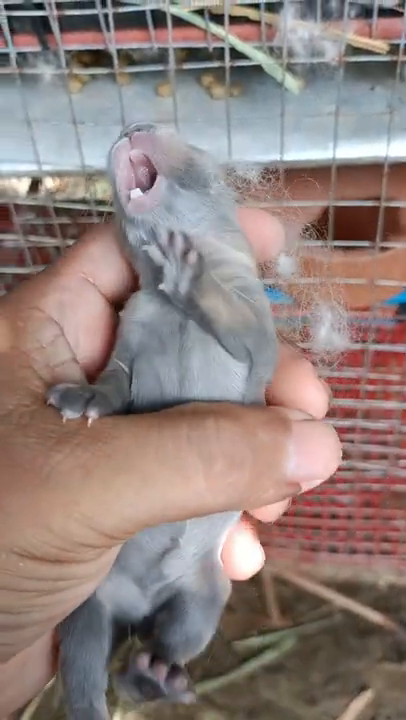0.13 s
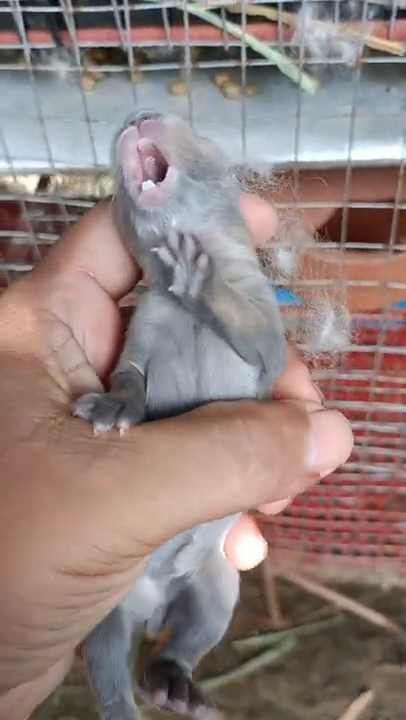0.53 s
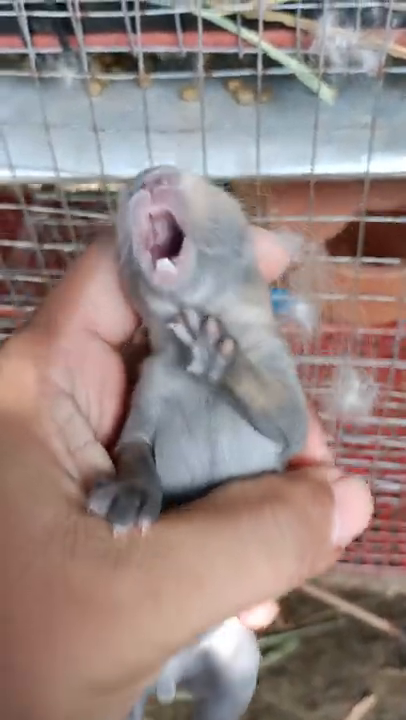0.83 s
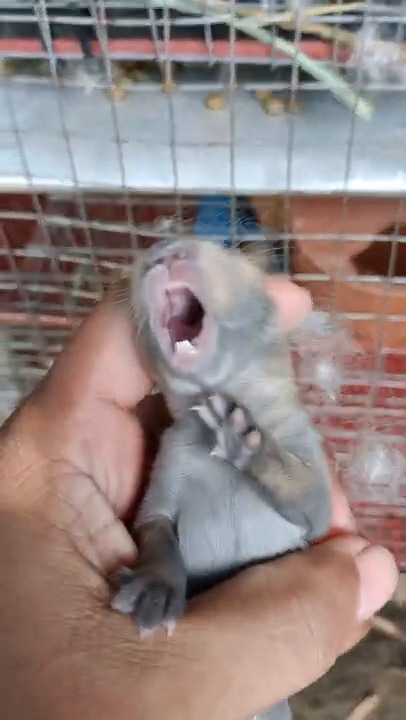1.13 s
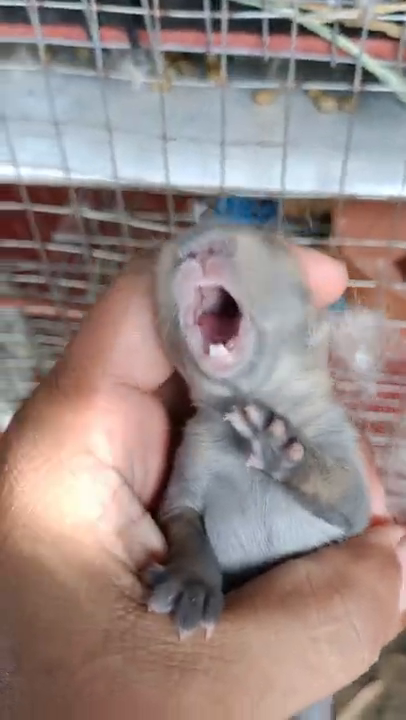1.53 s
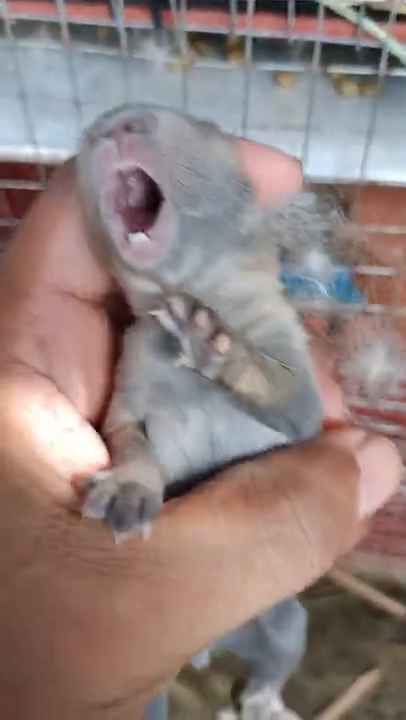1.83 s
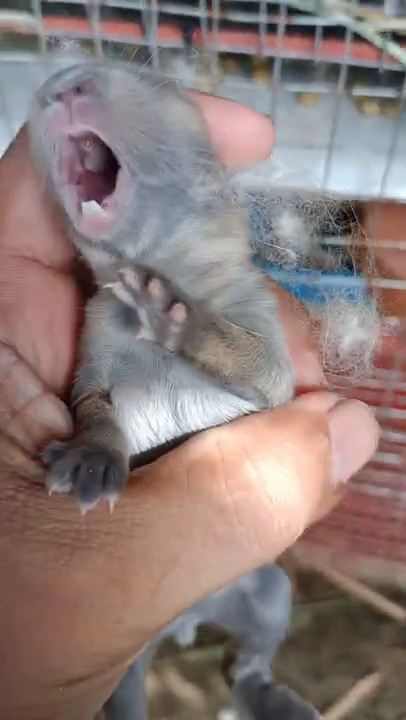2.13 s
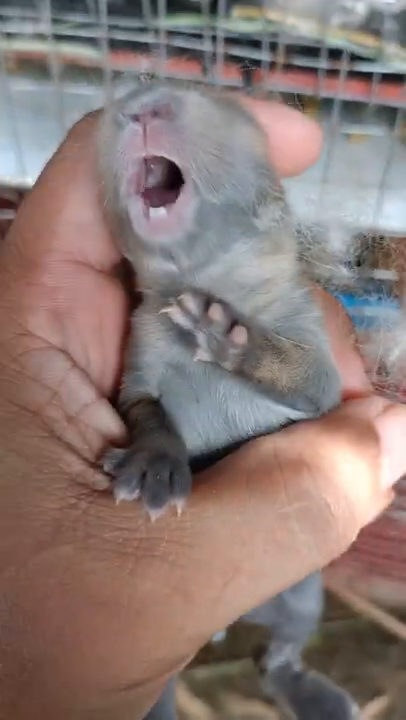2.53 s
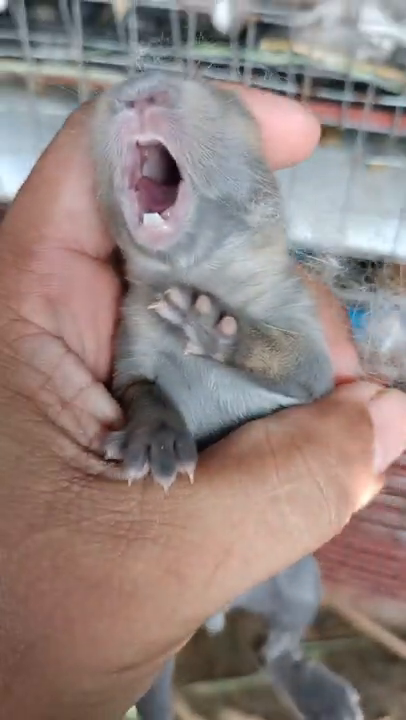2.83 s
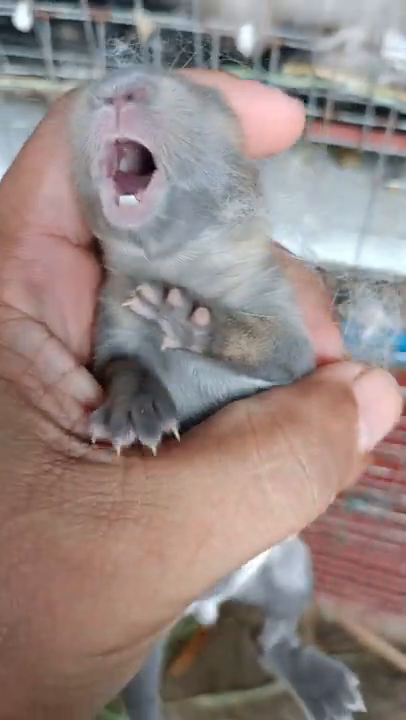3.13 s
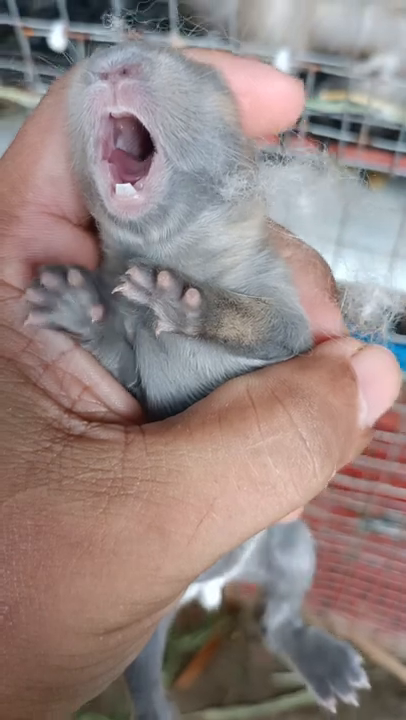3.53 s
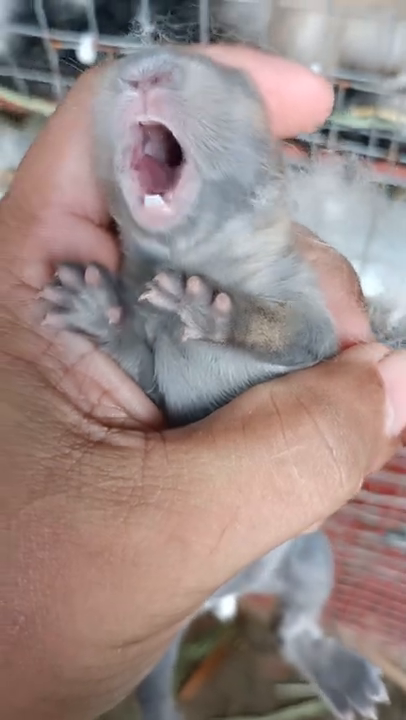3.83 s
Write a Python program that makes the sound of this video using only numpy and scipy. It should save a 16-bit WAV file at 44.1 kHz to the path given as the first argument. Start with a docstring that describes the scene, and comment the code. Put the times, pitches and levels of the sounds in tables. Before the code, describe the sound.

Harsh, piercing squeals of a baby rabbit repeat about every 0.6 seconds over faint shed hiss.

```python
"""Squeals of a young rabbit, the first already under way, come again and again from close to two ports.
Pulsed vocal folds and gated turbulence excite its throat: pitch rises, strong-weak pulses set in, and
the end sags hoarsely. Gliding narrow-band noise makes a thin wheeze between some squeals. Shaped noise
and a wavering sine give the faint hiss, rumble and hum of an open shed; dying dark noise gives two
dull thumps, and swelling near-sines give far cooing."""
import sys
import numpy as np
from scipy import signal
from scipy.fft import rfft, irfft, next_fast_len
from scipy.io import wavfile
from scipy.ndimage import uniform_filter1d, map_coordinates

SR = 44100
rng = np.random.default_rng(int(sys.argv[2]) if len(sys.argv) > 2 else 0)


def unload_wav(signal):
    """Save mono or channel-first audio to the path in sys.argv[1] as 16-bit WAV at rate SR, clipped to [-1, 1]."""
    wavfile.write(
        sys.argv[1],
        SR,
        np.round(np.clip(np.atleast_2d(signal).T, -1, 1) * 32767).astype(np.int16),
    )


N = 176400

# Pitch contour, one table per squeal: [t/s, f/Hz]
PITCH = [
    [(0.0, 1049), (0.024, 1233), (0.032, 1575), (0.066, 1106)],
    [(0.209, 774.1), (0.237, 1487), (0.263, 1749), (0.281, 1695), (0.301, 1980), (0.337, 2065),
     (0.413, 2086), (0.519, 2297), (0.611, 2114), (0.669, 1890), (0.685, 1472), (0.701, 996), (0.719, 899),
     (0.729, 1077), (0.741, 851), (0.776, 882)],
    [(0.916, 860.4), (0.95, 1777), (1.012, 2057), (1.052, 2197), (1.085, 2230), (1.11, 2186), (1.15, 2215),
     (1.172, 2256), (1.24, 2200), (1.254, 1980), (1.27, 1594), (1.3, 1622), (1.322, 940), (1.346, 1032),
     (1.364, 868), (1.398, 826)],
    [(1.542, 1101), (1.57, 1706), (1.6, 1950), (1.702, 2212), (1.812, 2162), (1.844, 2111), (1.866, 1960),
     (1.902, 1314), (1.92, 883), (1.942, 876), (1.958, 806), (1.99, 890), (1.996, 888)],
    [(2.142, 1127), (2.18, 1809), (2.288, 2197), (2.458, 2127), (2.468, 1910), (2.49, 1667), (2.5, 1337),
     (2.51, 1034), (2.54, 725), (2.564, 658), (2.582, 943)],
    [(2.728, 1050), (2.748, 1417), (2.77, 1745), (2.798, 1930), (2.894, 2170), (3.008, 2116), (3.022, 1930),
     (3.038, 1893), (3.054, 1433), (3.07, 1419), (3.086, 1022), (3.106, 1434), (3.118, 1414), (3.13, 795),
     (3.148, 671), (3.186, 722)],
    [(3.329, 837), (3.347, 1248), (3.359, 1637), (3.381, 1836), (3.487, 2190), (3.525, 2200), (3.625, 2097),
     (3.639, 1687), (3.655, 1670), (3.665, 1336), (3.681, 1330), (3.707, 890), (3.735, 749)],
    [(3.893, 868), (3.919, 1372), (3.941, 1640), (4.0, 1923)],
]
# Fold vibration from each moment on: [t/s, pulses per repeating pattern, pattern depth 0-1, rasp level/dB]
FOLD_REGIMES = [(0, 1, 0, -10), (.2, 1, 0, -7), (.243, 1, 0, -17), (.3, 2, .15, -13), (.367, 2, .55, -5),
                (.48, 2, .85, -19), (.57, 2, .8, -13), (.67, 2, .4, -8), (.7, 1, 0, -12), (.9, 2, .35, -7),
                (.955, 1, 0, -12), (.99, 1, 0, -8), (1.028, 3, .7, -11), (1.052, 2, .9, -17),
                (1.23, 2, .8, -12), (1.305, 1, 0, -12), (1.5, 2, .2, -8), (1.575, 1, 0, -13),
                (1.65, 3, .7, -9), (1.686, 2, .9, -18), (1.86, 2, .7, -11), (1.895, 1, 0, -13),
                (1.945, 1, 0, -8), (2.1, 2, .4, -7), (2.185, 1, 0, -10), (2.235, 3, .7, -10),
                (2.28, 2, .9, -15), (2.46, 2, .7, -11), (2.5, 1, 0, -9), (2.7, 2, .35, -7),
                (2.785, 1, 0, -6), (2.83, 3, .7, -9), (2.862, 2, .9, -14), (2.93, 2, .9, -10),
                (2.968, 2, .9, -17), (3.05, 1, 0, -14), (3.105, 1, 0, -9), (3.3, 2, .25, -8),
                (3.38, 1, 0, -7), (3.423, 3, .7, -12), (3.468, 2, .9, -17), (3.625, 2, .4, -11),
                (3.66, 1, 0, -9), (3.85, 1, 0, -9), (3.945, 2, .2, -5)]
# Lead of the pattern train over the plain pulse train, before its wander: [cycles], one per squeal
PATTERN_LEAD = [0.019, 0.072, 0.12, 0.085, 0.11, 0.011, 0.1, 0.018]
# Unsteady four-pulse pattern on top of the two-pulse one, before rasp colour: [level/dB], one per squeal
QUARTER_LEVEL = [-20, -7, -16, -16, -4, -4, -6, -7]
# Spectral colour of the rasp against the pulses: [f/Hz, level/dB]
RASP_COLOUR = [(1000, -13), (3600, -14), (5000, -3), (9000, -3), (11000, 4)]
# Transfer function of throat, mouth and microphone: [f/Hz, level/dB]
THROAT = [(500, -43.5), (800, -21.5), (1500, -15), (2200, -9), (3300, -15), (4300, -8), (5400, 3),
          (6000, -3), (6600, -2.5), (7200, -7.5), (8200, 2.5), (9000, -6), (9700, -13.5), (12500, -21.5),
          (16000, -19)]
# Mouth settings, one row per squeal: [partials under the resonance level/dB, resonance level/dB]
MOUTH = [(3, -14.7), (-1, -1.9), (-1.5, 3.5), (-5, 0), (1, 0.7), (0, 3.7), (1.5, -0.8), (2, 2)]
# Vocal effort before the port gain, one table per whole squeal:
# [t/s, level/dB, upper throat resonance level/dB, treble level/dB]
EFFORT = [
    [(0.209, -27, -8, -27), (0.215, -25, -13, 3.5), (0.253, -19, 4.5, 3.5), (0.665, -16.5, 9.5, 2.5),
     (0.759, -24, -9.5, -2), (0.776, -41, -14, -13)],
    [(0.916, -27.5, -30, -25), (0.93, -20, -1.5, 1.5), (1.098, -15, 0, -4), (1.27, -16, 3, -2.5),
     (1.382, -21.5, -10, -4), (1.398, -39.5, -7, -31)],
    [(1.542, -20, -11, -6.5), (1.548, -19, -11.5, 0), (1.648, -15.5, 1, -2), (1.89, -17, 0.5, 1),
     (1.982, -22.5, -11.5, -5), (1.996, -33, -16, -1)],
    [(2.142, -16.5, -14, -3), (2.15, -21, -12, 3), (2.172, -17.5, 5, 4), (2.492, -14.5, 9, 5),
     (2.562, -21, -8.5, 8.5), (2.582, -38.5, -37.5, -15)],
    [(2.728, -23, -3, -25), (2.738, -18.5, -11, 13), (2.768, -15.5, 7.5, 5), (3.086, -16, 3.7, 1.5),
     (3.172, -21, -7, 8), (3.186, -42, -20, -6)],
    [(3.329, -23.5, 2, 5), (3.339, -19.5, -13, 14.5), (3.365, -15, 6.5, 5.5), (3.691, -15.5, 8.5, 7.5),
     (3.717, -22, -8, 7), (3.735, -37, -29, -6)],
]
# The same columns for the squeals under way at start and end
EFFORT_AT_EDGES = [
    [(0.0, -20.5, 0.12, 0.1), (0.056, -23, 0.1, 0.1), (0.066, -40, 0.075, 0.1)],
    [(3.893, -27.5, 0.13, 0.083), (3.917, -18, 0.13, 0.12), (4.0, -14, 0.16, 0.13)],
]
# Colour change as the head turns towards the microphone: [f/Hz, level/dB]
TURNED_COLOUR = [(1000, 8), (2000, -2.5), (4200, 0.5), (5400, 5), (6600, -0.05), (9000, -2)]
# Wheeze before the port gain: [t/s, f/Hz, level/dB]
WHEEZE = [(0.06, 7060, -48), (.13, 7300, -62), (.145, 7800, -44), (.18, 7100, -44.5), (.205, 6850, -43.5),
          (.22, 6450, -80.5), (.76, 7600, -104), (.78, 7600, -46.5), (.91, 7430, -57.5), (.93, 7130, -72),
          (1.39, 7200, -110), (1.41, 7200, -55), (1.5, 7070, -59.5), (1.56, 7100, -105)]
# Right port against left: [f/Hz, level/dB]
RIGHT_COLOUR = [(500, -7), (1170, -8), (2200, 2.9), (4200, -2), (6400, -7.5), (8200, -3.5), (10500, -7.5),
                (15000, 2)]
# Lateness of the right port: [t/s, delay/s]
RIGHT_LAG = [(0, .00026), (2, 0.00026), (2.2, 0.0003), (4, .00031)]
# Echoes off hand and mesh, one table per port: [delay/s, gain]
ECHOES = [
    [(.0005, 0.07), (.0026, 0.035)],
    [(.0003, 0.38), (.0008, -0.1), (.0019, 0.5)],
]
# Shape of the background spectrum: [f/Hz, relative level/dB]
FLOOR_SPECTRUM = [(12, -54), (20, -5), (96, 0.5), (177, -13), (357, -12), (434, -13), (624, -13),
                  (1090, -18.5), (1610, -23), (3530, -26), (3950, -26), (16000, -49)]
# Background level before its 4 dB lift and wander: [t/s, level/dB]
FLOOR_LEVEL = [(0.0, -44.5), (0.42, -46.5), (3.75, -49), (4.0, -45)]
# Left-right likeness of the background: [f/Hz, likeness 0-1]
LIKENESS = [(130, 0.92), (290, 0.78), (640, 0.023)]
# Thumps: [t/s, level/dB, 60 dB decay time/s, upper band edge f/Hz]
THUMPS = [(0.145, -30, 0.25, 429), (1.051, -24.5, 0.13, 1070)]
# Far coos before their left-right balance: [t/s, length/s, f/Hz, level/dB]
COOS = [(2.6, .09, 610, -55), (3.05, .09, 600, -55), (3.36, .08, 600, -55), (3.65, .12, 590, -52),
        (3.94, .08, 590, -54)]

ATTACK_S, RELEASE_S = 0.0039, 0.0051
GLIDE_S, CHANGE_S = 0.005, 0.00064  # smoothing of pitch and of fold regime
RASP_GATE, FUNDAMENTAL = 0.72, 0.09  # depth of the rasp gating; extra weight of the lowest partial
QUARTER_WIDTH_HZ = 130
UPPER_HZ, UPPER_OCTAVES = 7600, 0.28
MOUTH_HZ, MOUTH_OCTAVES = 4430, 0.067
OPENING_S, OPENING_MOUTH_DB = 0.031, 12.5  # the mouth resonance is strong while the mouth opens
SLACK_HZ, SLACK_DB = 1900, -5  # loss under the mouth resonance, complete an octave below this pitch
TREBLE_HZ = 9500
TREBLE_HISS_DB, TREBLE_PULSES = -10, 0.85  # steady turbulence; share of the pulsed source kept
SHIFT_DB, SHIFT_RATE_HZ = 2.4, 14  # unrest of each narrow band
TURN_START_S, TURN_END_S = 1.95, 2.33
WHEEZE_WIDTH_HZ = 500
SHED_T60_S, SHED_DB = 0.27, -23.5
PORT_GAIN_DB = 6.5
HUM_HZ, HUM_DB = 121.6, -54.5
TOP, CUTOFF_HZ = 1.2, 15750


def amp(db):
    """Definition of level: 20 dB is a tenfold amplitude."""
    return 10 ** (np.asarray(db) / 20)


def rms_one(x):
    """Normalization to unit effective value."""
    return x / np.sqrt(np.mean(x ** 2) + 1e-20)


def in_time(rows):
    """Linear interpolation of each column against the first, time."""
    s, *columns = np.transpose(rows)
    return [np.interp(np.arange(N) / SR, s, column) for column in columns]


def at_hz(points, hz):
    """Interpolation along a logarithmic frequency axis."""
    table = np.array(points)
    return np.interp(np.log(hz + 1), np.log(table[:, 0]), table[:, 1])


def shaped(x, response):
    """Linear filtering: multiplication of the spectrum by a response, a function of frequency."""
    size = next_fast_len(N + SR // 4)
    hz = np.arange(size // 2 + 1) * SR / size
    return irfft(rfft(x, size) * response(hz), size)[..., :N]


def slow(rate_hz):
    """Random fluctuation: low-passed noise of spread 1."""
    low_pass = signal.butter(2, rate_hz, fs=SR, output="sos")
    return rms_one(signal.sosfilt(low_pass, rng.standard_normal(N)))


def pulses(cycles, hz):
    """Fourier synthesis of a pulse train, rms about 1: equal harmonics to 17 kHz in closed form."""
    count = np.floor(17000 / hz)
    w = np.pi * (cycles % 1) + 1e-9
    return (np.sin((2 * count + 1) * w) / np.sin(w) - 1) / np.sqrt(2 * count)


def ease(x):
    """Moving average: a step becomes a short ramp."""
    return uniform_filter1d(x, size=int(CHANGE_S * SR) + 1)


def vocal_folds(hz, which):
    """Subharmonic vibration: jittered pulses in weak-strong patterns, with rasp gated each cycle."""
    t = np.arange(N) / SR
    regimes = np.array(FOLD_REGIMES)
    now = regimes[np.clip(np.searchsorted(regimes[:, 0], t, "right") - 1, 0, None)]
    pattern, depth = np.round(now[:, 1]), np.clip(now[:, 2], 0, 1)
    two, three = ease(depth * (pattern == 2)), ease(depth * (pattern == 3))
    rasp = amp(ease(now[:, 3]))

    # rougher voice has more jitter
    jitter = slow(500) * (.1 + 4 * rasp) + slow(100) * (.25 + 5 * rasp) + 2.5 * slow(30)
    cycles = np.cumsum(hz) / SR + .008 * jitter
    lead = np.interp(t, [c[0][0] + .2 for c in PITCH], PATTERN_LEAD) + .015 * slow(15)
    led = cycles + lead
    folds = (1 - two - three) * pulses(cycles, hz)
    folds = folds + two * pulses(led / 2, hz / 2) + three * pulses(led / 3, hz / 3)
    folds = folds + FUNDAMENTAL * np.cos(2 * np.pi * cycles)

    # the difference of two trains leaves only the odd multiples of a quarter of the pitch
    odd = pulses(led / 4, hz / 4) - pulses((led + 2) / 4, hz / 4)
    quarter = two * amp(np.array(QUARTER_LEVEL)[which]) * slow(QUARTER_WIDTH_HZ) * odd

    # one noise shared by both ports plus one of each port's own
    air = rng.standard_normal(N) + rng.standard_normal((2, N))
    gating = 1 + RASP_GATE * np.cos(2 * np.pi * cycles)
    air = rasp * air * gating * amp(2.5 * slow(60))
    return folds + shaped(air + quarter, lambda f: amp(at_hz(RASP_COLOUR, f)))


def upper(f):
    """Resonance of the upper throat: a bell on a logarithmic frequency axis."""
    return np.exp(-.5 * (np.log2((f + 1) / UPPER_HZ) / UPPER_OCTAVES) ** 2)


def treble(f):
    """High-pass share above the upper resonance."""
    return (1 - upper(f)) / (1 + (TREBLE_HZ / (f + 1)) ** 10)


def mouth(f):
    """Resonance of the mouth: a narrow bell on a logarithmic frequency axis."""
    return np.exp(-.5 * (np.log2((f + 1) / MOUTH_HZ) / MOUTH_OCTAVES) ** 2)


def under(f):
    """Band-pass share of the partials under the mouth resonance."""
    return (1 - mouth(f)) * (f < MOUTH_HZ) / (1 + (1500 / (f + 1)) ** 6)


def remainder(f):
    """Complement: what the other four shares leave of the spectrum."""
    return 1 - upper(f) - treble(f) - under(f) - mouth(f)


def through_throat(x, share):
    """Source-filter principle: one share of the throat response, higher frequencies delayed more."""
    return shaped(x, lambda f: amp(at_hz(THROAT, f)) * share(f) * np.exp(-1j * (f / 2600) ** 2))


def restless(x):
    """Variable resonance: tongue and jaw never rest, so overlapping bands swell and fade independently."""
    spacing = 1100  # Hz
    out = 0
    for centre in np.arange(0, 17600, spacing):
        band = shaped(x, lambda f: np.clip(1 - abs(f - centre) / spacing, 0, 1))
        out = out + amp(SHIFT_DB * slow(SHIFT_RATE_HZ)) * band
    return out


def voice():
    """Source-filter principle: fold vibration excites throat and mouth; the level is evened, then shaped."""
    t = np.arange(N) / SR
    hz = uniform_filter1d(in_time(np.vstack(PITCH))[0], size=int(GLIDE_S * SR))
    starts = np.array([c[0][0] for c in PITCH])
    which = np.clip(np.searchsorted(starts - .05, t) - 1, 0, None)  # index of the squeal
    effort = np.vstack([EFFORT_AT_EDGES[0], *EFFORT, EFFORT_AT_EDGES[1]])
    db, upper_db, treble_db = in_time(effort)
    source = vocal_folds(hz, which)
    hiss = rng.standard_normal(N) + rng.standard_normal((2, N))
    hissy = TREBLE_PULSES * source + amp(TREBLE_HISS_DB) * hiss

    under_db, mouth_db = np.array(MOUTH)[which].T
    under_db = under_db + SLACK_DB * np.clip(np.log2(SLACK_HZ / hz), 0, 1)
    opening = np.exp(-np.clip(t - starts[which], 0, 1) / OPENING_S) * (which > 0)
    mouth_db = mouth_db + OPENING_MOUTH_DB * opening + 2.68 * slow(7.54)
    low = through_throat(source, remainder)
    low = low + amp(under_db) * through_throat(source, under)
    low = low + amp(mouth_db) * through_throat(source, mouth)
    sound = amp(0.78 * slow(35)) * low
    sound = sound + amp(upper_db + 2.2 * slow(38)) * through_throat(source, upper)
    sound = sound + amp(treble_db) * through_throat(hissy, treble)
    sound = restless(sound)

    turned = np.interp(t, [TURN_START_S, TURN_END_S], [0, 1])
    sound = (1 - turned) * sound + turned * shaped(sound, lambda f: amp(at_hz(TURNED_COLOUR, f)))
    sound = sound / np.sqrt(uniform_filter1d(sound[0] ** 2, size=700) + 1e-12)  # about 16 ms
    gate = 0
    for contour in PITCH:
        start, end = contour[0][0], contour[-1][0]
        attack = np.clip((t - start) / ATTACK_S + (start < .01), 0, 1)  # the first is already sounding
        gate = gate + attack * np.exp(-np.clip(t - end, 0, 1) / RELEASE_S)
    return sound * amp(db) * gate


def wheeze():
    """Turbulence in a constriction: air drawn through the narrow throat gives a gliding noise band."""
    hz, db = in_time(WHEEZE)
    turn = 2 * np.pi * np.cumsum(hz) / SR
    band = slow(WHEEZE_WIDTH_HZ) * np.cos(turn) + slow(WHEEZE_WIDTH_HZ) * np.sin(turn)
    return amp(db) * band


def ports(x):
    """Path difference and reflection: the right port is later; each has its colour, echoes and shed tail."""
    late = map_coordinates(x[1], [np.arange(N) - SR * in_time(RIGHT_LAG)[0]], order=5)
    t = np.arange(SR // 3) / SR
    out = []
    for side, (near, echoes) in enumerate(zip((x[0], late), ECHOES)):
        def response(f):
            """Interference: each delayed reflection adds a rotating phasor."""
            comb = 1 + sum(gain * np.exp(-2j * np.pi * f * delay) for delay, gain in echoes)
            return amp(side * at_hz(RIGHT_COLOUR, f)) * comb  # side 0 keeps its colour

        direct = shaped(near, response)
        tail = rng.standard_normal(len(t)) * amp(-60 * t / SHED_T60_S) * (t > .004)
        tail = tail / np.linalg.norm(tail)
        out.append(direct + amp(SHED_DB) * signal.fftconvolve(direct, tail)[:N])
    return np.array(out) * amp(PORT_GAIN_DB)


def background():
    """Partial coherence: rumble alike in both ports, hiss unlike, and a wavering hum."""
    def part(x, sign):
        """Sum or difference part of a partly coherent field."""
        def response(f):
            return amp(at_hz(FLOOR_SPECTRUM, f)) * np.sqrt(np.clip(1 + sign * at_hz(LIKENESS, f), 0, 2))
        return shaped(x, response)

    mid, side = rng.standard_normal((2, N))
    noise = rms_one(part(mid, 1) + part(side, -1.01) * [[1], [-1]])
    phase = 2 * np.pi * HUM_HZ * np.arange(N) / SR + 1.13 * slow(3.2)
    hum = amp(HUM_DB + 2.6 * slow(1.3)) * np.sin(phase)
    return noise * amp(in_time(FLOOR_LEVEL)[0] + 4 + 1.5 * slow(1.7)) + hum


def thumps():
    """Damped impact: bumps against the microphone give dark noise that decays exponentially."""
    t, out = np.arange(N) / SR, 0
    for s, db, t60, hz in THUMPS:
        band_pass = signal.butter(1, [hz / 7, hz], "band", fs=SR, output="sos")
        dark = rms_one(signal.sosfilt(band_pass, rng.standard_normal(N)))
        decay = amp(db - 60 * np.clip(t - s, 0, 1) / t60)
        out = out + dark * decay * np.clip((t - s) / 0.0011, 0, 1)
    return out


def coos():
    """Amplitude modulation: near-sine notes swell and fade, stronger in the left port."""
    t, out = np.arange(N) / SR, 0
    for s, length, hz, db in COOS:
        progress = np.clip((t - s) / length, 0, 1)
        swell = np.sqrt(np.sin(np.pi * progress) + 1e-12)
        out = out + amp(db) * swell * np.sin(2 * np.pi * hz * t)
    return out * amp([[2.5], [-2.5]])


def scene():
    """Superposition: voice and wheeze reach the ports, and the other sounds add to them."""
    return ports(voice() + wheeze()) + thumps() + coos() + background()


def record(dry):
    """Saturation and band limiting: peaks are rounded, then the top of the spectrum is cut."""
    low_pass = signal.ellip(12, .3, 75, CUTOFF_HZ, fs=SR, output="sos")
    return signal.sosfilt(low_pass, TOP * np.tanh(dry / TOP))


dry = scene()
out = record(dry)
unload_wav(out)
```